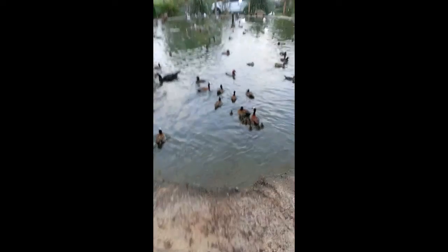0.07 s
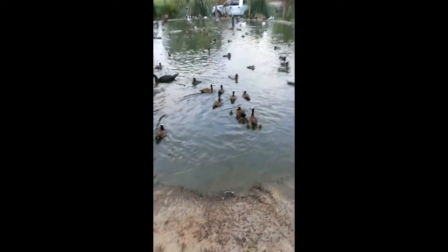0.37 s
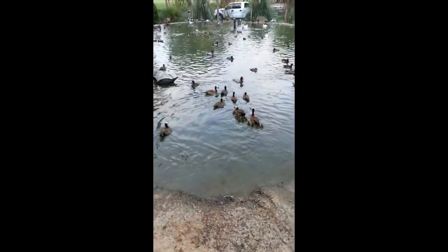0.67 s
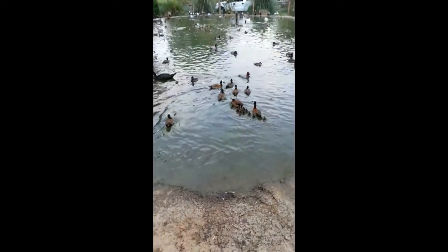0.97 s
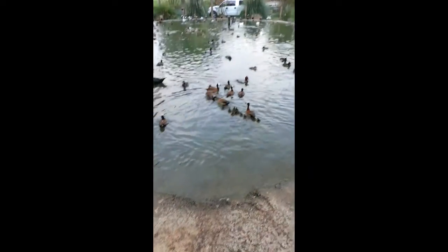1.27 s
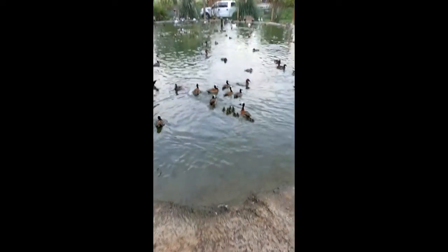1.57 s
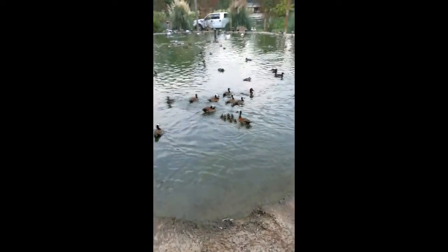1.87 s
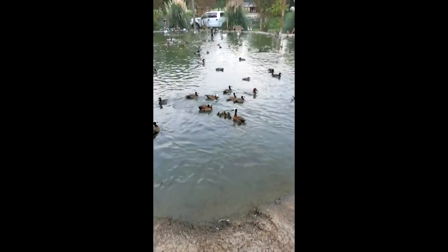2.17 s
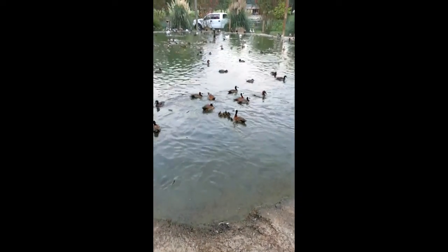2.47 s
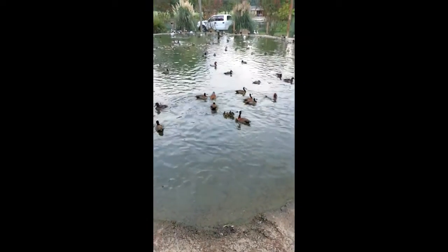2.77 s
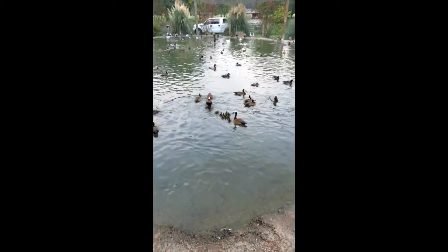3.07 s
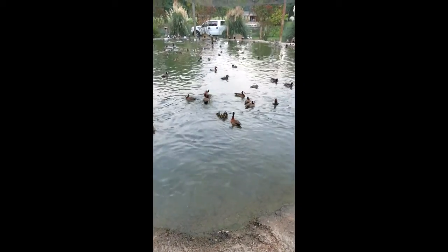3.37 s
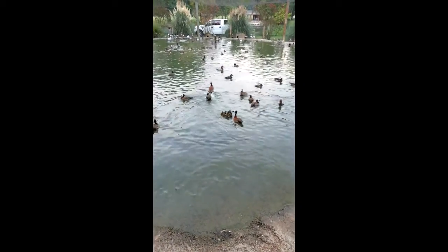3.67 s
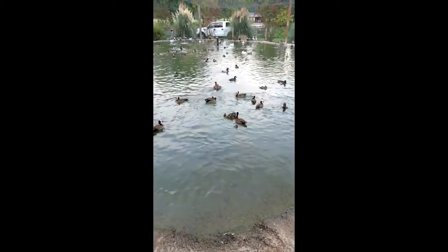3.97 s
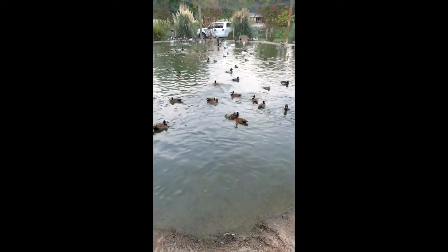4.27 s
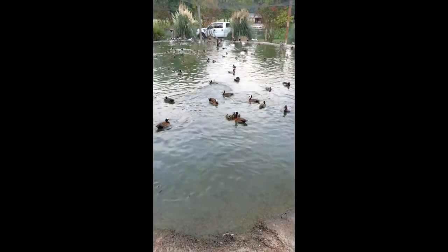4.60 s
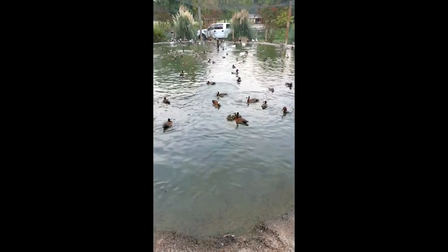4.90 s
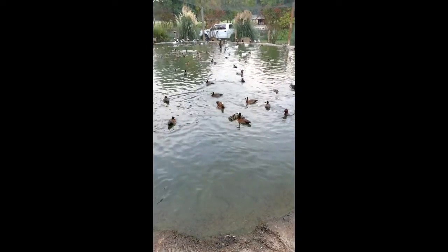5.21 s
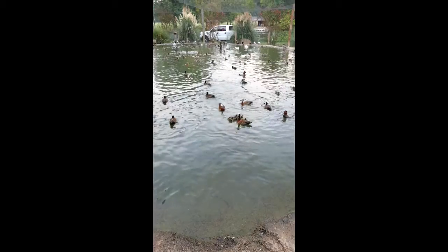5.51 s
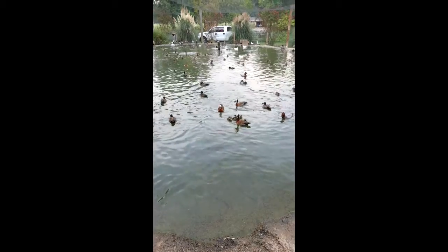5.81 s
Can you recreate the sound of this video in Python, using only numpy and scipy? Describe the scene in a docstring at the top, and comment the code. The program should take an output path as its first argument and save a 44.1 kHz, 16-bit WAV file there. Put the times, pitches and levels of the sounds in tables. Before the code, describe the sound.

Heard from the edge of a pond, ducks give four bursts of shrill, slurred whistles that rise and fall over one another. Between the bursts one bird peeps, others cry faintly far away, and paddling stirs the water into light sloshes and plops, mostly just past the middle. The last burst is the most crowded, then fades to faint cries and a small splash. A soft open-air hiss lies underneath.

```python
"""Whistling ducks call across a pond in four bursts, their swooping phrases overlapping.
Each syrinx is a nearly sinusoidal oscillator whose harmonics swell and fade as they sweep through
the peaks and notches of a fixed tone colour. One bird peeps and others cry far off. Paddling strokes
slosh the water, and trapped air pockets ring as damped resonators. Early reflections from the water
and a faint reverberant tail from the banks follow the calls, over a soft background hiss."""
import sys
import numpy as np
from scipy import signal
from scipy.fft import rfft, irfft
from scipy.io import wavfile
from scipy.ndimage import uniform_filter1d, minimum_filter1d

SR = 44100
rng = np.random.default_rng(int(sys.argv[2]) if len(sys.argv) > 2 else 0)


def wav_out(sig):
    """Save sig, one row per channel (or a flat mono array), as 16-bit PCM at SR to the path in sys.argv[1]."""
    wavfile.write(sys.argv[1], SR, np.round(np.clip(np.atleast_2d(sig).T, -1, 1) * 32767).astype(np.int16))


N = 257984
TIME = np.arange(N) / SR

# Ending, direction and timbre of each call: call, end_s, end_hz, left_minus_right_db, overtone_db
CALLS = [("a", .755, 2050, -1.02, -1.6), ("b", .725, 2200, -4, -0.89), ("c", .765, 2140, 5.4, 6.3),
         ("d", 1.125, 1950, -3.5, 2.2), ("e", 2.285, 1850, 10.5, -1.65), ("f", 2.145, 3000, 4.5, -19),
         ("g", 3.505, 3500, 6, -5.5), ("h", 4.47, 3700, 5.7, -8), ("i", 5.06, 2100, -1.7, 0.68),
         ("j", 4.995, 1980, 10.3, -4.5), ("k", 5.24, 1950, 6.1, -7.5), ("l", 5.26, 4500, 6.2, -8),
         ("m", 4.815, 2900, 10, -9), ("n", .34, 4300, -2, -10), ("o", 5.285, 1950, 7.6, -9)]
# Note contours: share_of_note, height (0 trough, 1 shoulder, 2 crest), accent_db
# A full call slurs a lead, a swoop and a long fall.
LEAD = [(0, 0.0072, -4), (.13, .23, 3), (.3, .92, -2.5), (.42, 1.08, 0), (.55, 1.87, 0.5), (0.649, 2, 3),
        (.78, 1.7, -1.5), (.88, .4, -4.5)]
SWOOP = [(0, 0.016, -4.5), (.23, 0.93, 1), (.35, 0.95, 3.5), (.52, 1.08, 1.5), (0.69, 2, 0), (.85, .95, -6)]
FALL = [(0, 0, -1), (.11, 1, -2), (.24, 2, 0.5), (.42, 1.78, -1), (.62, 1, -0.79), (.8, .5, 1)]
HOLD = [(0, 0, -13.5), (.17, 0.97, -1.5), (.4, 1.94, -0.5), (.72, 1, -.5), (.88, .45, -7)]  # a high voice dwells near one pitch
CLIMB = [(0, 0, -17), (.12, .85, -1.5), (.27, 1.07, 0), (.35, 1.29, -.5), (.44, 1.42, -1), (.53, 1.72, -4),
         (.68, 2, -5), (.81, 1.4, -12)]  # a high voice rises in steps
ARCH = [(0, 0, -0.16), (.2, 1, 2.84), (.5, 2, -2), (.78, .7, -1.4)]  # the plain rise and fall of a distant voice
TAIL = [(0, 0, 0.048), (.3, 2, 1), (.62, 1, 0)]  # a closing glide
# Notes, each lasting until the next of its call:
# call, contour, start_s, trough_hz, shoulder_hz, crest_hz, effort_db, swell_db
NOTES = [("a", LEAD, .168, 2200, 3600, 4020, -16.5, 0.89), ("a", SWOOP, .368, 2025, 3720, 3930, -18.5, -12),
         ("a", FALL, .53, 2420, 3150, 3630, -16.5, -6), ("b", CLIMB, .395, 3400, 4300, 6050, -12.5, -1.8),
         ("b", HOLD, .517, 2950, 4280, 4440, -13.5, 0), ("b", TAIL, .648, 3880, 3200, 3720, -24.5, -1.73),
         ("c", LEAD, .545, 2200, 3400, 4300, -26.5, -10.5),
         ("d", SWOOP, .784, 2150, 3350, 3880, -28.5, 2.7), ("d", FALL, .935, 2180, 2750, 3190, -23, 0),
         ("e", LEAD, 1.733, 2210, 3300, 4250, -22, -2.5), ("e", SWOOP, 1.945, 1900, 3410, 4060, -15.5, -9),
         ("e", FALL, 2.113, 2150, 2760, 3340, -13.5, 0), ("f", LEAD, 1.933, 2900, 3600, 4150, -22, 2.3),
         ("f", TAIL, 2.053, 2720, 2850, 2580, -20, 0), ("g", CLIMB, 3.125, 2900, 4100, 7100, -23.5, 0),
         ("g", CLIMB, 3.277, 3100, 4080, 6350, -17, 0), ("g", HOLD, 3.396, 3380, 4060, 4140, -17, 0),
         ("h", ARCH, 3.997, 3400, 4050, 4250, -35, -2), ("h", ARCH, 4.148, 3250, 4080, 4250, -37, -8),
         ("h", ARCH, 4.3, 3150, 4000, 4080, -35.5, 0), ("i", LEAD, 4.44, 2300, 3600, 4010, -20, 6),
         ("i", SWOOP, 4.67, 1950, 3720, 3960, -18.5, 10.8), ("i", FALL, 4.83, 2400, 3000, 3640, -23, 3),
         ("j", LEAD, 4.612, 2150, 3400, 4250, -25, -8), ("j", SWOOP, 4.84, 2075, 3450, 3750, -30, -31.5),
         ("k", FALL, 5.0, 2160, 2820, 3400, -21.5, -0.93), ("l", HOLD, 4.885, 4200, 4640, 4720, -33, 1),
         ("l", HOLD, 5.01, 4350, 4620, 4680, -34.5, -14), ("m", HOLD, 4.708, 3900, 4410, 4440, -18, 0),
         ("n", CLIMB, .215, 3900, 4500, 6650, -25, -7), ("o", ARCH, 4.975, 3500, 3620, 3980, -30, -8),
         ("o", TAIL, 5.13, 3250, 3050, 3450, -29.5, -1)]
# Source spectrum of the syrinx, harmonics 1 to 4: level_db
HARMONICS_DB = [0, -6.5, -9, -17]
# Tone colour of the whistles, overall peaks and notches: frequency_hz, gain_db
TONE_COLOUR = [(1900, -19.5), (2250, -12), (2560, -9), (3400, 0), (4250, 2.5), (4950, -0.5), (5650, -7),
               (6200, -16), (7000, -5.5), (8500, -6), (9300, -13.5), (10300, -14.5), (12000, -18),
               (13000, -24), (14400, -14)]
# Short falling peeps: time_s, level_db
PEEPS = [(1.61, -30.5), (1.716, -31), (2.672, -48), (2.778, -46), (2.888, -45), (3.01, -40), (3.523, -27.5),
         (3.641, -29), (3.754, -31), (3.863, -31), (3.983, -31)]
# Contour of one peep: offset_s, pitch_hz, offset_db
PEEP_CONTOUR = [(-.022, 3703, -13.5), (-.004, 3534, 3), (.012, 2800, -8), (.019, 2530, -10.5)]
# Distant falling cries: start_s, length_s, start_hz, end_hz, level_db, overtone_db
FAR_CRIES = [(1.112, 0.094, 4920, 4570, -45, -8), (1.24, 0.13, 4330, 3503, -47.5, -20),
             (4.058, 0.086, 2185, 1585, -50, 1), (4.196, 0.15, 4900, 4760, -42, -3),
             (5.56, .06, 1397, 1290, -61.5, 5.5), (5.612, .15, 1188, 1091, -59.5, 9),
             (5.692, .1, 1444, 1293, -62, 6)]
# Paddling strokes: peak_s, level_db
STROKES = [(1.41, -41.5), (3.25, -40.5), (3.5, -36), (3.63, -34.5), (5.84, -37.5)]
# Spectrum of sloshing water: frequency_hz, relative_density_db
SLOSH_SPECTRUM = [(35, -40), (70, -19.5), (150, -7.5), (300, -2), (480, -9), (750, 3.5), (1100, -5),
                  (2300, -7), (12000, -47)]
# Air pockets closing in the water, and short slaps on its surface (the briefest rows): start_s, pitch_hz,
# level_db, t60_s
PLOPS = [(1.364, 900, -32, 0.028), (1.396, 2130, -30, 0.023), (1.431, 666, -31, 0.088),
         (1.505, 541, -36.5, 0.17), (1.555, 652, -38, .1), (3.189, 2149, -28.5, 0.019),
         (3.232, 784, -36, .11), (3.322, 850, -35, 0.093), (3.52, 286, -33.5, 0.16),
         (3.577, 273, -20.5, 0.025), (3.577, 715, -18, 0.014), (3.649, 697, -25, 0.026),
         (3.684, 1160, -29.5, 0.034), (3.82, 290, -38, 0.14), (3.858, 635, -35, 0.13),
         (3.883, 890, -28, 0.013), (4.045, 632, -35.5, 0.069), (4.342, 1335, -32.5, 0.023),
         (5.742, 765.4, -28.5, 0.024), (5.746, 334, -33.5, 0.059), (5.831, 250, -35, 0.085)]
# Spectrum of the background noise floor: frequency_hz, relative_density_db
HISS_SPECTRUM = [(80, -24), (200, -11), (480, -13.5), (950, -7.5), (1800, -15.5), (3800, -5.5),
                 (6000, -20.5), (7400, -8), (10000, -28), (13000, -26), (14100, -11), (14750, -38)]
# Likeness of noise at the two ears: frequency_hz, coherence
COHERENCE = [(600, 0.58), (2500, 0.067)]
# Brief dips in the overall level: middle_s, half_length_s, depth_db
DIPS = [(4.75, .005, -16), (5.318, .014, -14)]

ONSET_S, RELEASE_S, EDGE_DB = 0.013, 0.026, -9.5  # every call swells in and dies away
JITTER, SHIMMER_DB = .0045, 1.9  # unsteadiness of pitch (as a share) and of level
UNDERTONE_DB, HAZE_DB = -38, -24  # gains of the rasp and the noise haze that follow the tone
RESONANCE_HZ, RESONANCE_SPACING_HZ, CLING = 4218, 691.5, 0.48  # windpipe modes and their pull on a climb
BREAK_HZ, THIN_DB = 5040, -4.5  # above this pitch a climbing note turns thin
LEFT_LAG_MS, RIPPLE_DB = 0.19, -8  # delay between the ears; gain of the early reflections
BANK_DB, BANK_DB_PER_DB = -28.5, 0.7715  # fainter calls are farther off and more reverberant
FAR_SAG, FAR_FADE_DB = .35, -3.5  # share of the pitch drop done halfway; loss by the end
STROKE_RISE_S, STROKE_DECAY_S, LAPPING_DB = 0.057, 0.17, -54
BUBBLES_PER_S, BUBBLE_DB, BUBBLE_CYCLES = 90, 3.5, 20.5  # rate, level against sloshing, periods per t60
HISS_DB, START_S, CUTOFF_HZ = -45.5, .2275, 15000


def ducks():
    """Multipath propagation: calls arrive directly, off the rippled water, and later from the banks."""
    peeps = sum(whistle(np.add(PEEP_CONTOUR, [s, 0, db]), overtone_db=-17.0) for s, db in PEEPS)
    far = sum(far_cry(*row) for row in FAR_CRIES) + flock(count=6)
    direct = place(peeps + far, pan_db=6.0, lag_ms=0.073)
    near = peeps
    to_banks = from_db(-15.0) * peeps + from_db(-6.5) * far
    for call, end_s, end_hz, pan_db, overtone_db in CALLS:
        notes = [note[1:] for note in NOTES if note[0] == call]
        voice = whistle(slur(notes, end_s, end_hz), overtone_db)
        effort_db = np.mean([db for *_, db, swell_db in notes])
        direct = direct + place(voice, pan_db, LEFT_LAG_MS)
        near = near + voice
        to_banks = to_banks + from_db(BANK_DB - BANK_DB_PER_DB * effort_db) * voice
    ripples = reflections(near, t60_s=0.069, delay_s=0.001014, lowpass_hz=12800, count=80)
    banks = reflections(to_banks, t60_s=1.05, delay_s=.02, lowpass_hz=7660, count=350)
    return direct + from_db(RIPPLE_DB) * ripples + banks + haze(near)


def whistle(contour, overtone_db, fade_s=0.00093):
    """Source and filter: each overtone of the syrinx swells as it crosses a peak of the tone colour."""
    knot_s, knot_hz, knot_db = np.transpose(contour)
    span = (TIME >= knot_s[0]) & (TIME < knot_s[-1])
    t, out = TIME[span], np.zeros(N)
    hz = glide(knot_s, knot_hz, t) * (1 + JITTER * drift(700, size=len(t)))
    phase = 2 * np.pi * np.cumsum(hz) / SR
    level_db = np.interp(t, knot_s, knot_db)
    effort_db = level_db - at_hz(TONE_COLOUR, hz)
    thinning_db = .7 * np.maximum(level_db + 24, 0)  # the loudest notes have the weakest overtones
    fade = np.clip(np.minimum(t - knot_s[0], knot_s[-1] - t) / fade_s, 0, 1)
    for k, harmonic_db in enumerate(HARMONICS_DB, 1):
        source_db = harmonic_db + (overtone_db - thinning_db * (2 / k) ** 2) * (k > 1)
        flutter = drift(249.9, size=len(t))
        shimmer_db = SHIMMER_DB * np.sqrt(k) * flutter
        gain = from_db(effort_db + source_db + shimmer_db + at_hz(TONE_COLOUR, k * hz))
        out[span] += np.sqrt(2) * gain * (k * hz < CUTOFF_HZ) * fade * np.sin(k * phase)
    # Period doubling: pushed hard, the syrinx rasps an octave below.
    rasp = from_db(level_db + UNDERTONE_DB) * np.tanh(thinning_db) * (1 + flutter)
    out[span] += rasp * np.sin(phase / 2)
    return out


def slur(notes, end_s, end_hz):
    """Frequency and amplitude modulation join notes into one call: rows of time_s, pitch_hz, level_db."""
    next_troughs = [note[1:3] for note in notes[1:]] + [(end_s, end_hz)]
    t = np.arange(notes[0][1], end_s, .001)
    points, climbing = [], np.zeros(len(t))
    for note, (next_s, next_hz) in zip(notes, next_troughs):
        contour, start_s, trough_hz, shoulder_hz, crest_hz, effort_db, swell_db = note
        for share, height, accent_db in contour:
            floor_hz = trough_hz + share * (next_hz - trough_hz)
            hz = np.interp(height, range(3), [floor_hz, shoulder_hz, crest_hz])
            db = effort_db + accent_db + swell_db * (share - .5)
            points.append((start_s + share * (next_s - start_s), hz, db))
        climbing[(t >= start_s) & (t < next_s)] = contour is CLIMB
    points.append((end_s, end_hz, points[-1][2]))
    knot_s, knot_hz, knot_db = np.transpose(sorted(points))
    hz = glide(knot_s, knot_hz, t)
    for _ in range(2):  # frequency pulling toward the windpipe modes turns a climb into steps
        mode_angle = 2 * np.pi * (hz - RESONANCE_HZ) / RESONANCE_SPACING_HZ
        pull_hz = np.sin(mode_angle) * RESONANCE_SPACING_HZ / (2 * np.pi)
        hz = hz - CLING * uniform_filter1d(climbing, size=9) * pull_hz
    thin_db = THIN_DB * uniform_filter1d(climbing * (hz > BREAK_HZ), size=5)
    edge = np.maximum(1 - np.minimum((t - t[0]) / ONSET_S, (end_s - t) / RELEASE_S), 0)
    level_db = np.interp(t, knot_s, knot_db) + at_hz(TONE_COLOUR, hz) + thin_db + EDGE_DB * edge
    return np.transpose([t, hz, level_db])


def haze(voice):
    """Envelope following: a faint band of noise swells and fades with each whistle."""
    envelope = np.sqrt(np.abs(uniform_filter1d(voice ** 2, size=900)))
    band = signal.butter(2, [2200, 7000], "band", fs=SR, output="sos")
    noise = signal.sosfilt(band, signal.sosfilt(band, shaped_noise(TONE_COLOUR)))
    return from_db(HAZE_DB) * envelope * noise


def far_cry(start_s, length_s, start_hz, end_hz, level_db, overtone_db):
    """Downward frequency sweep: one distant note sags ever faster as it fades."""
    contour = [(start_s, start_hz, level_db),
               (start_s + length_s / 2, start_hz + FAR_SAG * (end_hz - start_hz), level_db),
               (start_s + length_s, end_hz, level_db + FAR_FADE_DB)]
    return whistle(contour, overtone_db, fade_s=0.0036)


def flock(count):
    """Independent sources: distant birds join the last burst in turn, each at its own pitch."""
    starts_s = np.linspace(4.85, 5.17, count)
    pitches_hz = rng.uniform(2890, 4600, count)
    return sum(far_cry(s, length_s=.15, start_hz=hz, end_hz=.7 * hz, level_db=-40.5, overtone_db=0)
               for s, hz in zip(starts_s, pitches_hz))


def reflections(x, t60_s, delay_s, lowpass_hz, count):
    """Diffuse scattering: weak, dulled echoes, different at each ear, decay exponentially with delay."""
    when = rng.random((2, count))
    sizes = rng.standard_normal((2, count)) * from_db(-60 * when)
    response = np.zeros((2, int((t60_s + delay_s) * SR) + 1))
    for ear in range(2):
        arrivals = ((delay_s + t60_s * when[ear]) * SR).astype(int)
        np.add.at(response[ear], arrivals, sizes[ear] / np.linalg.norm(sizes[ear]))
    echoes = signal.fftconvolve(x[None], response, axes=1)[:, :N]
    return signal.sosfilt(signal.butter(2, lowpass_hz, fs=SR, output="sos"), echoes + 1e-18)


def water():
    """Power addition: paddling and steady lapping together drive sloshing and bubbles, beside plops."""
    strokes = [from_db(db) * np.exp(-np.maximum((s - TIME) / STROKE_RISE_S, (TIME - s) / STROKE_DECAY_S))
               for s, db in STROKES]
    stirring = np.sqrt(from_db(LAPPING_DB) ** 2 + sum(stroke ** 2 for stroke in strokes))
    slosh = stirring * sloshing(flicker_db=3.0, rate_hz=110)
    return slosh + place(plops(PLOPS) + bubbles(stirring), pan_db=-1.5, lag_ms=0.12)


def plops(rows, octaves_per_s=15.0, swell_share=0.051):
    """Damped resonance: a trapped air pocket rings, rising in pitch as it nears the surface."""
    out = np.zeros(N)
    for start_s, pitch_hz, level_db, t60_s in rows:
        span = slice(int(start_s * SR), int((start_s + t60_s) * SR))
        age_s = np.arange(len(out[span])) / SR
        phase = 2 * np.pi * np.cumsum(pitch_hz * 2 ** (octaves_per_s * age_s)) / SR
        swell = 1 - np.exp(-age_s / (swell_share * t60_s))
        out[span] += 2 * from_db(level_db - 60 * age_s / t60_s) * swell * np.sin(phase)
    return signal.sosfilt(signal.butter(2, 160, "high", fs=SR, output="sos"), out + 1e-18)


def bubbles(stirring, low_hz=300, high_hz=2600):
    """Resonators of equal Q: small bubbles of random size ring as loudly as the water is stirred."""
    when, smallness, strength = rng.random((int(BUBBLES_PER_S * N / SR), 3)).T
    hz = low_hz * (high_hz / low_hz) ** smallness
    stirring_db = 20 * np.log10(stirring[(when * N).astype(int)])
    level_db = stirring_db + BUBBLE_DB + 10 * np.log10(strength ** 2 + 1e-6)
    return plops(zip(when * N / SR, hz, level_db, BUBBLE_CYCLES / hz))


def sloshing(flicker_db, rate_hz):
    """Random amplitude modulation: half-octave noise bands flicker, partly in step, as lumpy sloshing."""
    edges_hz = 30 * 2 ** np.arange(0, 9.4, .485)
    out, common_flicker = 0, drift(rate_hz)
    white = rng.standard_normal((2, 2, N))
    for k, (low_hz, high_hz) in enumerate(zip(edges_hz, edges_hz[1:])):
        band = signal.butter(2, [low_hz, high_hz], "band", fs=SR, output="sos")
        mid, side = signal.sosfilt(band, white[k % 2])
        hz = np.sqrt(low_hz * high_hz)
        gain = from_db(at_hz(SLOSH_SPECTRUM, hz) + flicker_db * (common_flicker + drift(rate_hz)))
        out = out + gain * two_ears(mid, side, hz)
    return unit_rms(out)


def noise_floor():
    """Background noise floor: a soft, wavering hiss with a thin high band near 14 kHz."""
    return from_db(HISS_DB + 2.45 * drift(29)) * shaped_noise(HISS_SPECTRUM)


def shaped_noise(spectrum):
    """Spectral weighting colours steady white stereo noise; rms 1."""
    hz = np.linspace(1, SR / 2, N // 2 + 1)
    mid, side = rfft(rng.standard_normal((2, N)))
    return unit_rms(irfft(two_ears(mid, side, hz) * from_db(at_hz(spectrum, hz)), N))


def two_ears(mid, side, hz):
    """Interaural coherence: noise is more alike at the two ears in the bass."""
    coherence = at_hz(COHERENCE, hz)
    return np.sqrt(1 + coherence) * mid + np.sqrt(1 - coherence) * side * [[1], [-1]]


def place(x, pan_db, lag_ms):
    """Interaural differences of level and arrival time give a source its direction."""
    left = np.interp(TIME - lag_ms / 1000, TIME, x)
    return np.array([left, x]) * unit_rms(from_db([[pan_db / 2], [-pan_db / 2]]))


def glide(knot_s, knot_hz, t):
    """Monotone cubic interpolation: a rounded pitch path that never overshoots its points."""
    span_s = np.maximum(np.diff(knot_s), 1e-4)
    slope = np.diff(knot_hz) / span_s
    before, after = slope[:-1], slope[1:]
    inner = 2 * np.maximum(before * after, 0) / (before + after + 1e-9)
    tangent = np.r_[slope[0], inner, slope[-1]]
    k = np.clip(np.searchsorted(knot_s, t) - 1, 0, len(span_s) - 1)
    share = np.clip((t - knot_s[k]) / span_s[k], 0, 1)
    bend = (1 - share) * (tangent[k] - slope[k]) - share * (tangent[k + 1] - slope[k])
    return knot_hz[k] + span_s[k] * share * (slope[k] + (1 - share) * bend)


def drift(rate_hz, size=N):
    """Random fluctuation: straight lines join rate_hz standard normal values a second."""
    knots = rng.standard_normal(int(N / SR * rate_hz) + 2)
    return np.interp(np.arange(size) / SR * rate_hz, np.arange(len(knots)), knots)


def at_hz(points, hz):
    """Linear interpolation on a log-frequency axis."""
    knot_hz, values = np.transpose(points)
    return np.interp(np.log(hz), np.log(knot_hz), values)


def from_db(db):
    """Decibels to amplitude ratio."""
    return 10 ** (np.asarray(db) / 20)


def unit_rms(x):
    """Normalisation to unit mean power."""
    return x / np.sqrt(np.mean(x ** 2) + 1e-20)


def scene():
    """Superposition: ducks and water add to the noise floor."""
    return ducks() + water() + noise_floor()


def record(dry):
    """Gating, limiting and low-pass filtering: a short silence, two dips, peaks held down, top cut."""
    dip_db = sum(depth_db * np.exp(-((TIME - middle_s) / half_length_s) ** 2)
                 for middle_s, half_length_s, depth_db in DIPS)
    gated = dry * from_db(dip_db) * (TIME >= START_S)
    limiter_gain = 1 / np.maximum(np.abs(gated).max(axis=0), 1)
    limited = gated * uniform_filter1d(minimum_filter1d(limiter_gain, size=200), size=200)
    return signal.sosfilt(signal.ellip(10, .1, 80, CUTOFF_HZ, fs=SR, output="sos"), limited)


dry = scene()
out = record(dry)
wav_out(out)
```